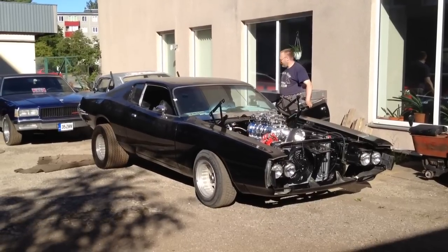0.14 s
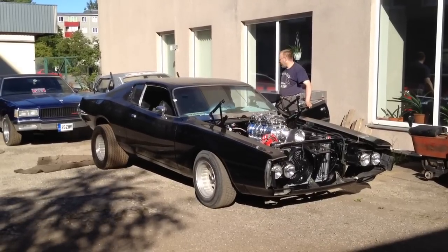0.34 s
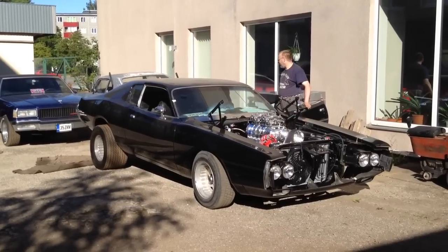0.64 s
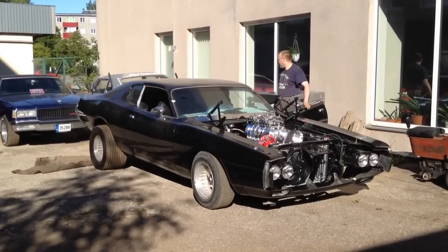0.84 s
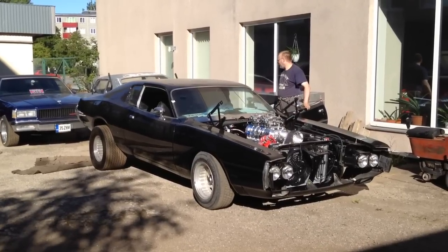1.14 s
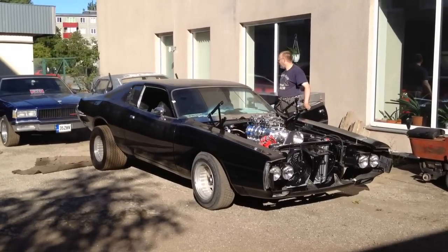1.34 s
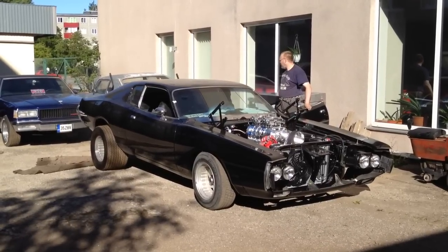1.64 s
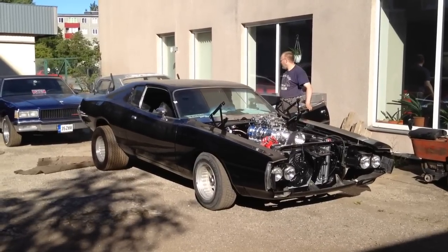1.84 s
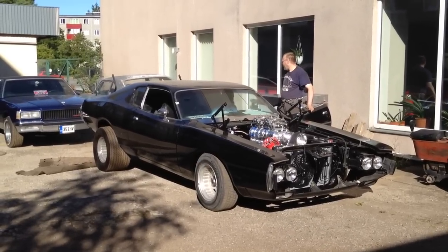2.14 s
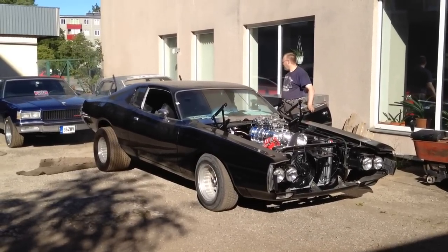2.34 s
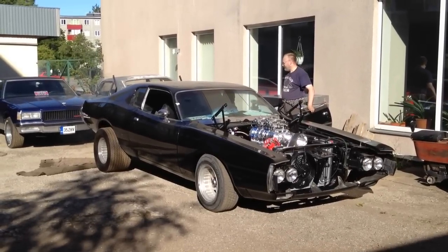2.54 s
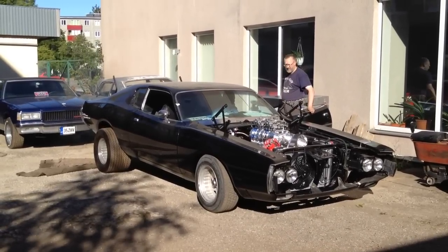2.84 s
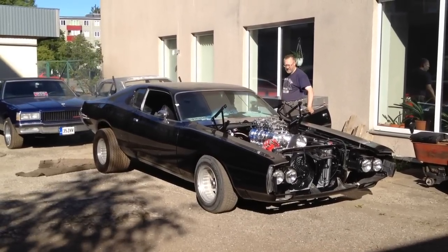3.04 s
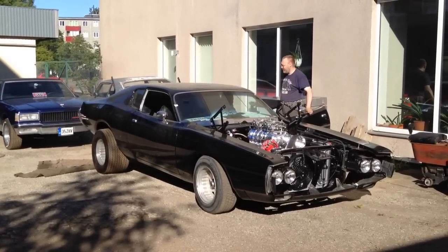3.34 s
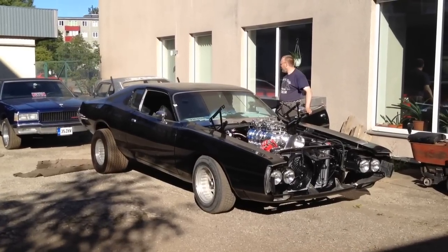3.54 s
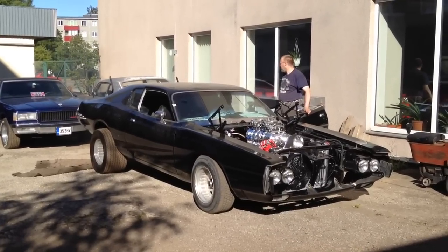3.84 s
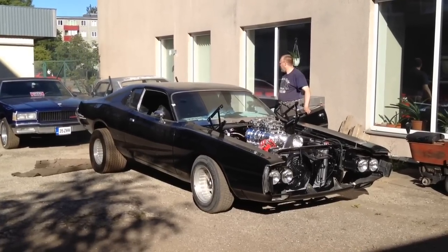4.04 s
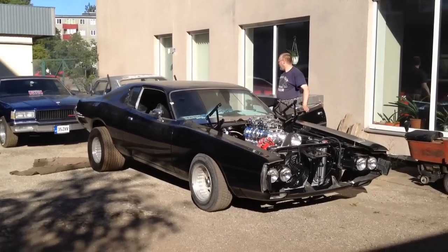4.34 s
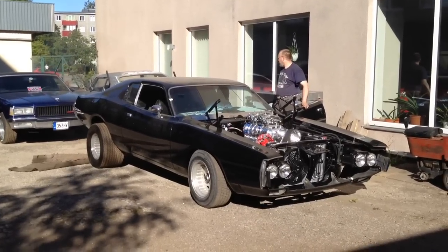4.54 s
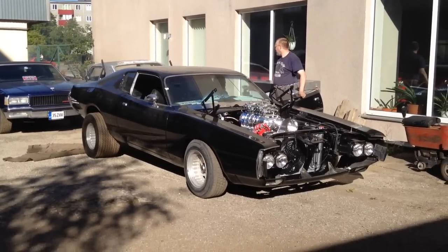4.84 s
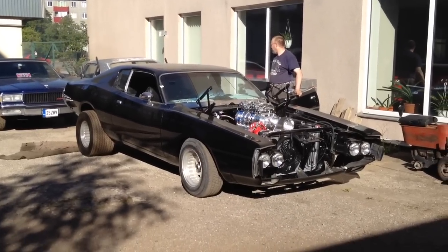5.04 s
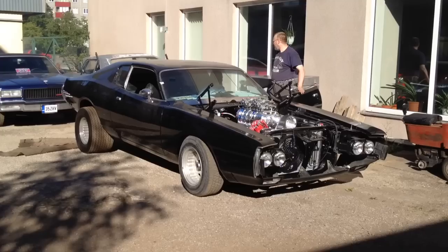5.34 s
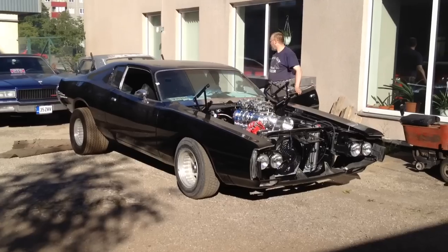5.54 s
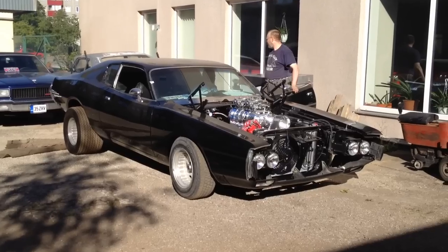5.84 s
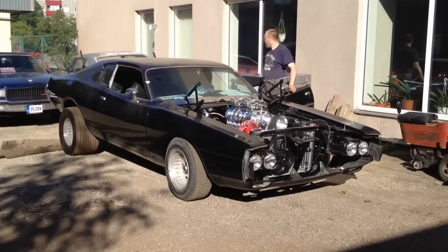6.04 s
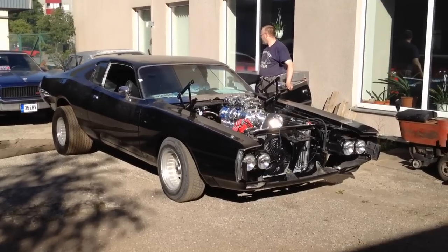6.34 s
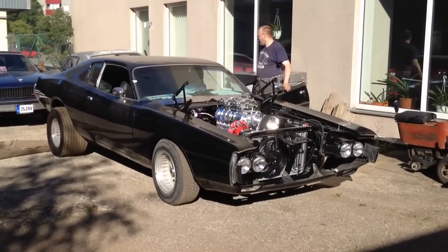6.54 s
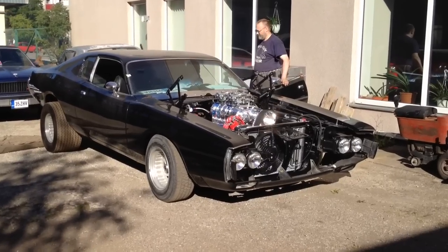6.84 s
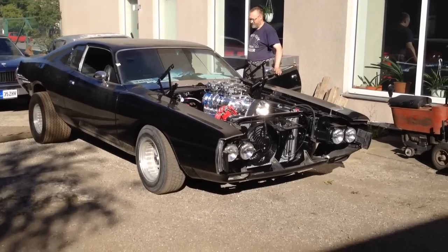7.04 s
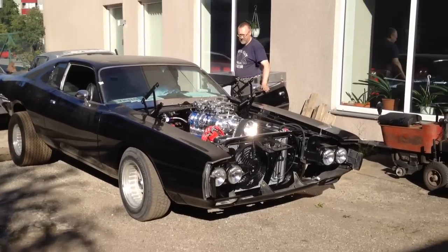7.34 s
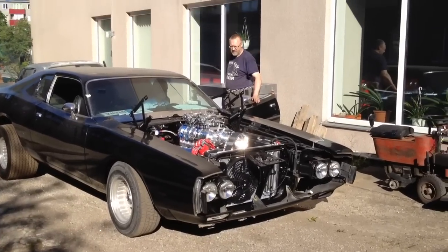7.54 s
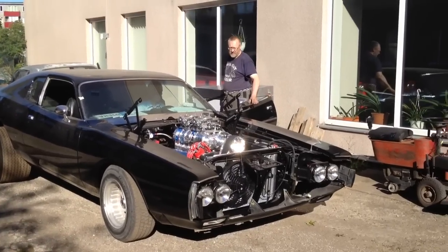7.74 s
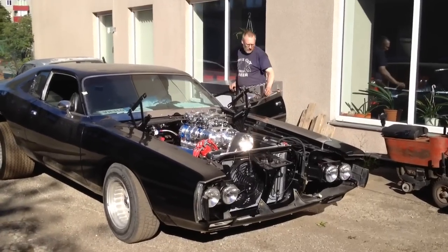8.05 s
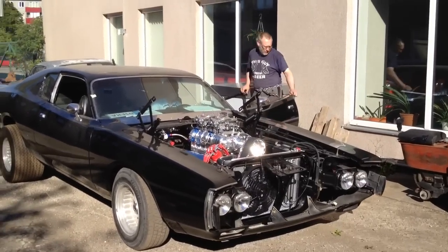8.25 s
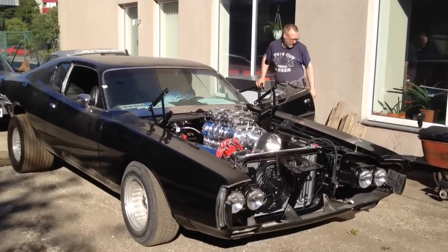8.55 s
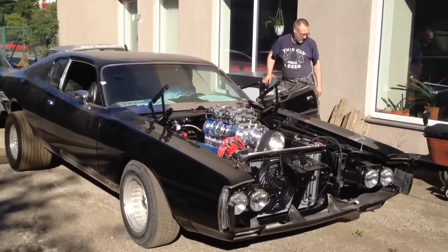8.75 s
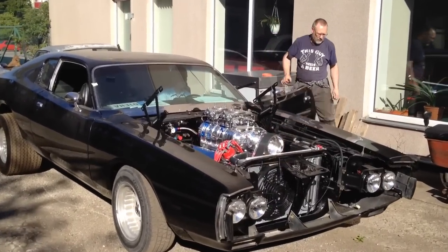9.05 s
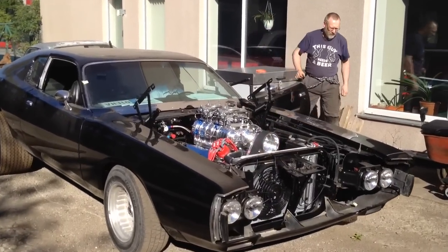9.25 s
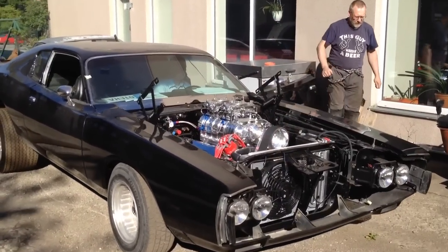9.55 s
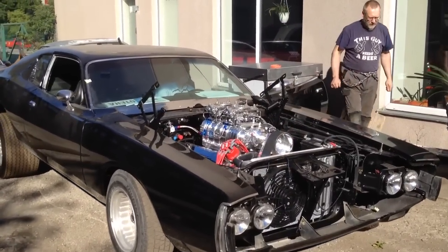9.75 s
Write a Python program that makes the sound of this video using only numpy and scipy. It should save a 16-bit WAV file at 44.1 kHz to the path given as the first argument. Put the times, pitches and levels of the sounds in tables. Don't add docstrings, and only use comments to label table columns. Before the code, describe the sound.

In a walled yard, a heavy V8 with a toothed-belt blower struggles to catch, surging and dying back several times, faster and stronger each time. Air sucks and flutters, exhaust blares low and lumpy, gas rasps. Then a fast idle holds, slowly creeping up in pitch, with a wavering shrill whine on top. The handheld phone approaches the open engine bay; thin bass, slightly saturated peaks.

```python
import sys
import numpy as np
from scipy import signal
from scipy.fft import rfft, irfft
from scipy.io import wavfile
from scipy.ndimage import uniform_filter1d

SR = 44100
rng = np.random.default_rng(int(sys.argv[2]) if len(sys.argv) > 2 else 0)


def waveform_to_disk(signal):
    frames = np.transpose(np.atleast_2d(signal))
    scaled = np.clip(frames, -1, 1) * 32767
    samples = np.round(scaled).astype(np.int16)
    wavfile.write(sys.argv[1], SR, samples)


def boost(x):
    u = np.asarray(x, float) / 20
    return 10 ** u


N = 436149

# pitch_hz, width_hz, level_db
PIPE = [(102.8, 13.8, -4), (122.3, 34, -11), (177.5, 24.6, -2), (202.4, 22.7, 2), (225, 56, -6),
        (293.2, 48, -10.5), (379.2, 12.9, -10.5), (433, 170, -31), (600.6, 22, -20)]
IDLING_DB = -49


def curve(table):
    s, *columns = np.transpose(table)
    return [np.interp(np.arange(N) / SR, s, c) for c in columns]


def unit(x, follow_s=None):
    power = np.mean(x ** 2) if follow_s is None else uniform_filter1d(x ** 2, int(follow_s * SR))
    return x / np.sqrt(power + 1e-12)


def colour(x, points, lo_hz, hi_hz):
    hz = np.fft.rfftfreq(N, 1 / SR) + 1
    point_hz, point_db = np.transpose(points)
    gain = boost(np.interp(np.log(hz), np.log(point_hz), point_db))
    inside = (hz > lo_hz) & (hz < hi_hz)
    return irfft(rfft(x) * gain / np.sqrt(np.sum(gain[inside] ** 2) / len(hz)), N)


def ring(x, hz, width):
    return signal.lfilter(*signal.iirpeak(hz, hz / width, SR), x)


def walk(rate):
    lowpass = signal.butter(2, rate / 2, fs=SR / 32, output="sos")
    coarse = signal.sosfilt(lowpass, rng.standard_normal(N // 32 + 2))
    return np.interp(np.arange(N) / 32, np.arange(len(coarse)), unit(coarse))


def traffic():
    # pitch_hz, level_db (per Hz)
    murmur = [(40, -32), (90, -23), (200, 19), (500, -20), (2000, 1), (8000, -40), (15000, -46)]
    return boost(-46 + 1.1 * walk(1.0)) * colour(rng.standard_normal(N), murmur, 40, 15000)


def speed():
    # picks_up_s, from_hz, fastest_s, fastest_hz, sagged_s
    hunts = [
        (.28, 7.4, .55, 11.2, .83),
        (.87, 7.8, 1.2, 12.9, 1.55),
        (1.62, 6.7, 2.01, 13.3, 2.29),
        (2.4, 9.6, 2.68, 16.6, 3.02),
        (3.1, 9.9, 3.36, 18.7, 3.63),
        (3.9, 10.6, 4.32, 18.7, 4.7),
    ]
    # start_s, cycles_hz
    idle = [(4.75, 13.85), (5.0, 15.16), (5.6, 15.39), (6.2, 15.74), (7.1, 16.27), (8.0, 16.55),
            (8.45, 16.8), (9.0, 17.15), (9.5, 17.24)]
    rows, lows = [], [row[1] for row in hunts[1:]] + [idle[0][1]]
    for (picks, low_hz, top, top_hz, sagged), next_hz in zip(hunts, lows):
        rows += [(picks, low_hz), (top, top_hz), (sagged, next_hz)]
    s, hz = np.transpose(rows + idle)
    place = np.interp(np.arange(N) / SR, s, np.arange(len(s)))
    part = place % 1
    eased = np.where(place < len(rows) + 1, .5 - .5 * np.cos(np.pi * part), part)
    return uniform_filter1d(np.interp(place - part + eased, np.arange(len(s)), hz), SR // 40)


def firings(cycle):
    # strength_db, header_travel_ms
    cylinders = [(-5.5, 0.22), (7, 2.28), (5, 1.65), (5, 3.87), (-5, 0.33), (-10.5, 2.45), (5, 1.32),
                 (-8, 2.2)]
    scatter_db, uneven = 3.8, .6
    count = np.arange(1, int(8 * cycle[-1]))
    at = np.interp(count, 8 * cycle, np.arange(N))
    own_db, travel_ms = np.array(cylinders)[count % 8].T
    chance = rng.standard_normal((N // 100, 2))[:len(count)].T
    late_ms = uneven * travel_ms + 0.13 * scatter_db * chance[1]
    at = np.clip(at + late_ms * SR / 1000, 0, N - 2)
    size = boost(uneven * own_db + scatter_db * chance[0])
    whole, part = at.astype(int), at % 1
    return np.bincount(whole, size * (1 - part), N) + np.bincount(whole + 1, size * part, N)


def puffs(pulses, decay_s, steady):
    flare = signal.lfilter([1], [1, -np.exp(-1 / (decay_s * SR))], np.sqrt(pulses))
    return unit(rng.standard_normal(N) * (steady + unit(flare, 1.0)), 0.37)


def throttle():
    # opens_s, wide_s, shuts_s, ajar_db, wide_db
    gulps = [
        (.1, 0.423, 0.52, -62, -49),
        (.69, .98, 1.23, -59.5, -48.5),
        (1.508, 1.847, 2.11, -64, -49),
        (2.3, 2.525, 2.68, -61, -45.5),
        (2.95, 3.202, 3.38, -55, -49.5),
        (3.57, 4.16, 3.56, -61.5, -50.5),
    ]
    # start_s, extra_db
    flutters = [(.07, -2), (.125, 10), (.24, -6), (.29, 3.5), (.72, 4), (.81, -4), (.89, 5.5), (1.11, -4),
                (1.56, 8), (1.63, -7), (2.39, 7), (3.6, 0)]
    shut_db, ajar_s, snap_s, flutter_s = -64, 0.053, .1, 0.018
    rows = [(0.049, gulps[0][3])]
    for opens, wide, shuts, ajar_db, db in gulps:
        rows += [(opens, shut_db), (opens + ajar_s, ajar_db)]
        rows += [(wide, db), (shuts, db), (shuts + snap_s, shut_db)]
    t = np.arange(N) / SR
    flutter = sum(db * np.exp(-((t - s) / flutter_s) ** 2) for s, db in flutters)
    caught_db = -53.5
    caught = [(rows[-1][0], caught_db), (4.6, caught_db), (5.6, IDLING_DB)]
    return curve(rows[:-1] + caught)[0] + flutter


def suction(pulses, hunting):
    # pitch_hz, level_db (per Hz)
    hiss = [(2500, 6.5), (4000, 12.5), (7500, 12), (9500, 3.5), (10700, -2), (13300, -2), (14600, -1.5),
            (15300, -16), (16000, -17)]
    whistle_db = np.interp(hunting, (0, 1), (-7, 4))
    air = colour(puffs(pulses, 0.0072, 4.5), hiss, 9810, 13440)
    highpass = signal.butter(2, 11000, "high", fs=SR, output="sos")
    top = signal.sosfilt(highpass, air)
    top = signal.sosfilt(highpass, top[::-1])[::-1]
    return air + (boost(whistle_db) - 1) * top


def burning(hunting):
    # catches_s, strongest_s, exhaust_db, dies_to_db
    bursts = [
        (0.42, .55, -18.5, -29),
        (0.983, 1.054, -19.5, -23.5),
        (1.172, 1.238, -12, -35),
        (1.807, 1.987, -17.5, -20),
        (2.04, 2.097, -16.5, -32.5),
        (2.564, 2.72, -13, -31),
        (3.134, 3.399, -14, -29.5),
        (3.99, 4.386, -11.5, -19.5),
    ]
    cranking_db, light_s, climb_db_per_s, die_s = -28.5, 0.065, 35, 0.12
    lumpy_db, lumps_hz = 3.5, 4.7
    t = np.arange(N) / SR
    db = np.full(N, cranking_db)
    for catch, top, top_db, low_db in bursts:
        climb = top_db - climb_db_per_s * (top - t)
        lit = np.clip((t - catch) / light_s + 1, 0, 1)
        dying = low_db + (top_db - low_db) * np.exp(-np.abs(t - top) / die_s)
        db = np.where(t < top, db + lit * (climb - db), dying)
    weak = np.clip((-13 - db) / 12, 0, 1)
    return db + hunting * lumpy_db * weak * walk(lumps_hz)


def exhaust(pulses):
    blows = unit(pulses - uniform_filter1d(pulses, SR // 40), .3)
    pipes = 0
    for k, (hz, width, db) in enumerate(PIPE):
        drive = blows + 1.04 * rng.standard_normal(N)
        wide = 1.31 * width
        pipes = pipes + (-1) ** k * boost(db) * ring(ring(drive, hz, wide), hz, wide)
    return unit(pipes, 0.11)


def housing(x, share):
    # pitch_hz, width_hz, lift_db
    panels = [(1300, 140, 14.5), (1818, 78, 5.5), (1986, 46, 6.5), (2136, 15, 13), (3500, 570, 7.5),
              (4000, 92, -13), (3900, 51, 9.5), (4316, 260, 7), (4760, 67, 9), (6470, 150, 14)]
    return x + share * sum((boost(db) - 1) * ring(x, hz, width) for hz, width, db in panels)


def rasp(pulses):
    # pitch_hz, level_db (per Hz)
    gas = [(300, -0.5), (420, -2), (640, 2), (894, -5.5), (1090, -2.5), (1500, -7), (2100, 2), (2320, -1),
           (3050, -2), (4200, -4), (6000, -14.5), (8000, -16.5), (10500, -37.5), (15000, -66)]
    return colour(housing(puffs(pulses, 0.0039, 3.9), 0.047), gas, 470, 1400)


def belt(cycle, hunting):
    # multiple, level_db, smear
    overtones = [(1, 3, 1.27), (2, -4, 2.77), (3, -11.5, 2.77), (4, -18, 2.75)]
    # pitch_hz, level_db
    opening = [(600, -26), (1550, -4), (1750, 0.5), (6000, -1), (9000, -0.5)]
    teeth = 118.6
    shrill_db = np.interp(hunting, (0, 1), (-.5, 4.5))
    wobble = np.interp(hunting, (0, 1), (.12, .48))
    turn = 2 * np.pi * 2 * cycle
    slip = 1.35 * np.sin(turn + .9 * walk(6)) + .6 * np.sin(turn / 2 + 1.2)
    slip = slip + .9 * walk(45) + .34 * walk(250)
    mesh = 2 * np.pi * teeth * cycle
    tone = 0
    for k, db, smear in overtones:
        grip_db = 2.2 * np.sin(turn + 1.5) + (1.5 if k == 1 else 3.2) * walk(70)
        lift_db = ((k == 2) - (k == 3)) * shrill_db
        phase = k * mesh + smear * (1 + (k > 1) * wobble) * slip
        tone = tone + boost(db + lift_db + grip_db) * np.sin(phase)
    return colour(0.49 * housing(tone, 0.84), opening, 2200, 21000)


def belt_level(octaves, intake_db):
    # start_s, level_db
    grip = [(.9, -14), (1.2, 1), (1.6, -19), (2.0, 2.5), (2.16, 0.5), (2.4, -8), (2.57, -6), (2.66, 2.5),
            (2.74, 0), (2.81, -8), (3.15, -9), (3.33, -0.5), (4.3, 1.5), (4.75, -0.5), (5.1, 1.5), (6.8, 3),
            (7.4, 1.5), (8.6, 2)]
    slow_db = 24 * np.minimum(octaves, 0)
    unloaded_db = .25 * np.minimum(intake_db - IDLING_DB, 0)
    return -24 + slow_db + unloaded_db + curve(grip)[0]


def rotor(cycle, octaves):
    meshes = [66.8, 246.]
    drive_db = 15 * octaves
    tone = 0
    for mesh, db, slip, rate in zip(meshes, (-43.5, -35), (1.2, 2.2), (40, 90)):
        level = boost(db + drive_db + 3.25 * walk(rate))
        tone = tone + level * np.sin(2 * np.pi * mesh * cycle + slip * walk(rate))
    return housing(tone, 0.21)


def note(cycle, rate):
    # multiple_of_cycle, cold_db, warm_db
    partials = [(5, -20, -22), (6, -25, -2), (7, -11, -6), (7.98, 7.5, -3.5), (9.26, -9, -16),
                (10.04, -5.5, -16), (10.96, -19, 3), (12.17, -6.5, -3), (13, -11, -3), (13.87, -11, -6.5),
                (14.94, -3.5, -7), (15.92, -23, -22), (16.79, -5.5, -2), (17.79, 1, -7), (18.73, -0.5, -9),
                (20, -7, -8), (20.4, -4, -12), (21.63, -19, -3), (22.6, -1, -7.5), (23.74, -9, -10),
                (29.17, -1, -7.5), (36.26, -12, -3)]
    # start_s, warmth_0_to_1
    warming = [(4.5, 0.9), (4.62, 0.05), (6.5, 0.23), (6.65, 0.59), (8.0, 0.7), (8.85, 0.97)]
    hz = np.arange(20., 800)
    power = sum(boost(2 * db) / (1 + ((hz - f * f / hz) / (0.88 * w)) ** 2) ** 2 for f, w, db in PIPE)
    pipes_db = 10 * np.log10(power)
    warmth, out = curve(warming)[0], 0
    for k, cold_db, warm_db in partials:
        db = cold_db + warmth * (warm_db - cold_db) + 0.68 * np.interp(k * rate, hz, pipes_db)
        level = boost(db + 1.43 * walk(4.1))
        drift = 0.9 * rng.standard_normal() + 0.24 * walk(4.4)
        out = out + level * np.sin(k * 2 * np.pi * cycle + drift)
    return unit(out, 0.4)


def yard(x):
    # delay_ms, level_db
    echoes = [(13, -17), (27, -18), (46, -19)]
    t60_s, tail_db = .45, -13
    t = np.arange(SR // 2) / SR
    tail = rng.standard_normal(len(t)) * np.exp(-np.log(1000) * t / t60_s) * (t > .012)
    response = boost(tail_db) * tail / np.sqrt(np.sum(tail ** 2))
    response[0] = 1
    for ms, db in echoes:
        response[int(ms * SR / 1000)] += boost(db)
    return signal.fftconvolve(x, response / np.sqrt(np.sum(response ** 2)))[:N]


def scene():
    # start_s, distance_m
    distance = [
        (6.2, 3.36),
        (7.5, 3.4),
        (8.8, 2.44),
        (9.89, 2.5),
    ]
    # start_s, share_0_to_1 of exhaust power that repeats every cycle
    repeating = [(4.15, .08), (4.28, .6), (4.44, .6), (4.55, .05), (5.0, .18), (5.1, .66), (5.9, .66),
                 (6.0, .35), (6.2, .5), (6.5, .5), (6.62, .45), (7.1, .88), (8.5, .88), (9.0, .96)]
    rate = speed()
    cycle = np.cumsum(rate) / SR
    octaves = np.log2(rate / 16.2)
    hunting = np.interp(np.arange(N) / SR, (4.42, 4.58), (1, 0))
    near_db = 20 * np.log10(distance[0][1] / curve(distance)[0])
    burn_db, intake_db = burning(hunting), throttle()
    pulses = firings(cycle)

    chatter_db = 2.2 * hunting * walk(16)
    air = boost(intake_db + chatter_db) * suction(pulses, hunting)
    whine = boost(belt_level(octaves, intake_db)) * belt(cycle, hunting) + rotor(cycle, octaves)
    bay = boost(near_db) * (air + whine)

    gas_db = -34.5 + 0.5 * (burn_db + 17) + 0.21 * (intake_db + 51) + 3 * hunting + 2 * octaves + near_db
    blow = boost(burn_db + near_db)
    steady = curve(repeating)[0]
    engine = blow * np.sqrt(1 - steady) * exhaust(pulses) + boost(gas_db) * rasp(pulses) + bay
    return (yard(engine) + blow * np.sqrt(steady) * note(cycle, rate) + traffic())[None]


def thrift(x):
    # pitch_hz, share_0_to_1
    dropped = [(2000, .002), (8500, .004), (10500, .02), (13500, .015), (14300, .1), (14900, .5),
               (15300, .8)]
    hz, _, z = signal.stft(x, SR, nperseg=1024)
    band = (hz / 260).astype(int)
    luck = rng.random((band[-1] + 1, z.shape[-1] // 2 + 1))
    luck = np.repeat(luck, 2, axis=1)[band, :z.shape[-1]]
    keep = luck > np.interp(hz, *np.transpose(dropped), left=0)[:, None]
    return signal.istft(z * keep, SR, nperseg=1024)[1][:, :N]


def band_limit(x):
    return signal.sosfilt(signal.butter(12, 15200, fs=SR, output="sos"), x)


def record(dry):
    rounded = np.tanh(1.459 * dry) / 1.28
    thin = signal.sosfilt(signal.butter(5, 92, "high", fs=SR, output="sos"), rounded)
    thin = thin - .85 * ring(thin, 2280, 120)
    wind = [(20, -6), (40, -2), (60, 0), (90, -20), (200, -50)]  # (Hz, dB)
    breeze = boost(-63) * colour(rng.standard_normal(N), wind, 10, 200)
    return band_limit(thrift(thin + breeze))


dry = scene()
out = record(dry)
waveform_to_disk(out)
```